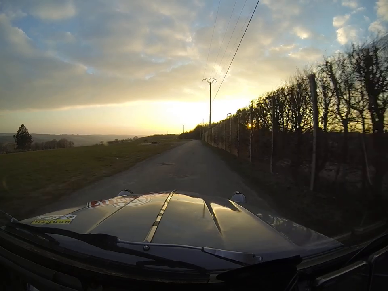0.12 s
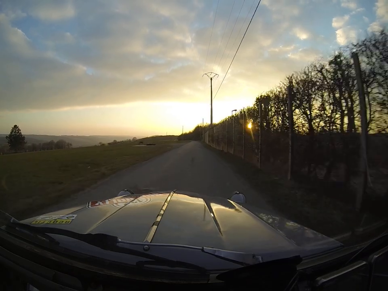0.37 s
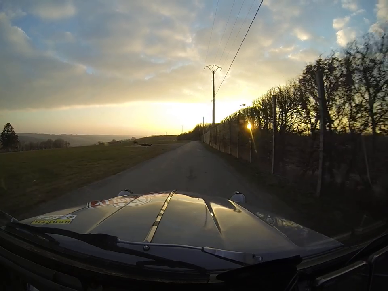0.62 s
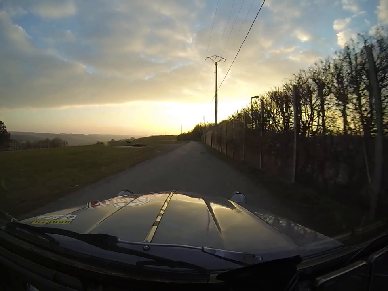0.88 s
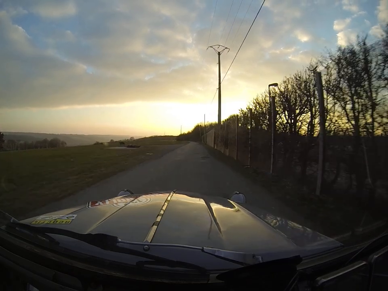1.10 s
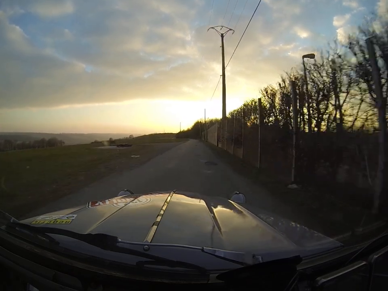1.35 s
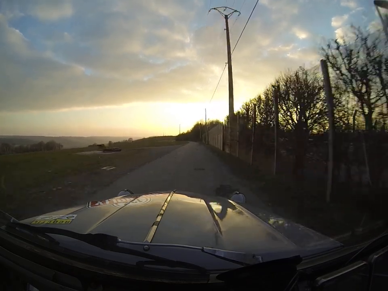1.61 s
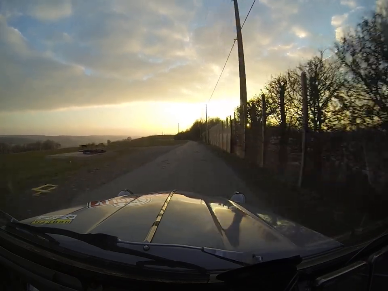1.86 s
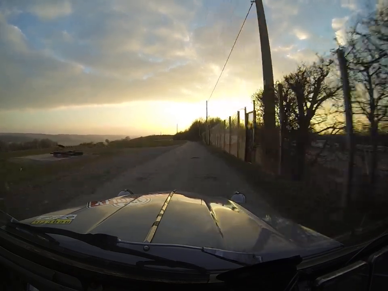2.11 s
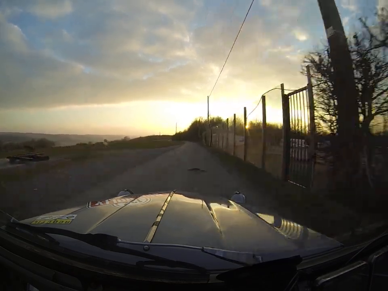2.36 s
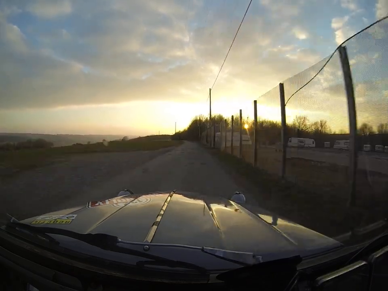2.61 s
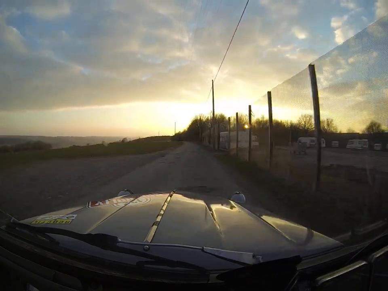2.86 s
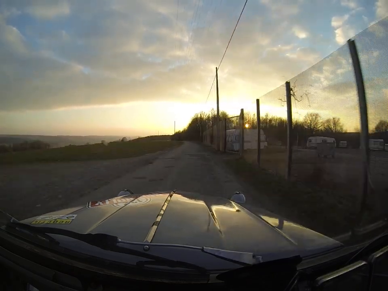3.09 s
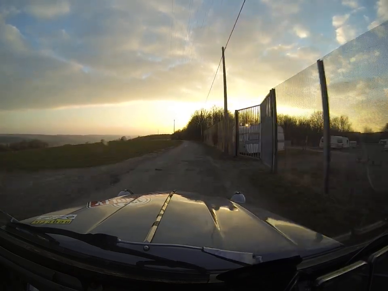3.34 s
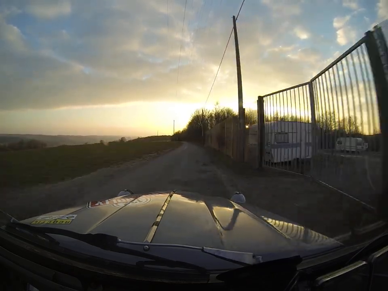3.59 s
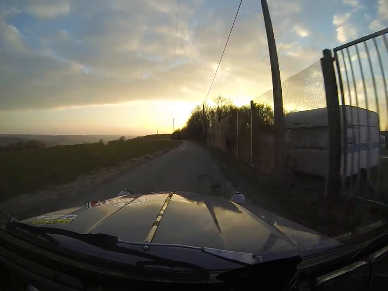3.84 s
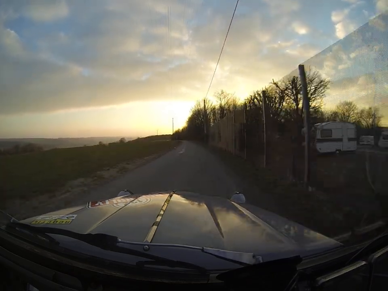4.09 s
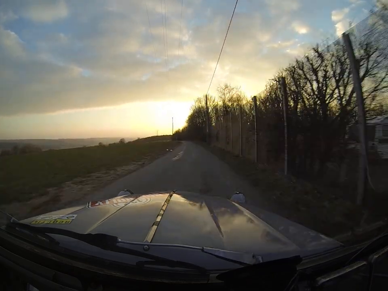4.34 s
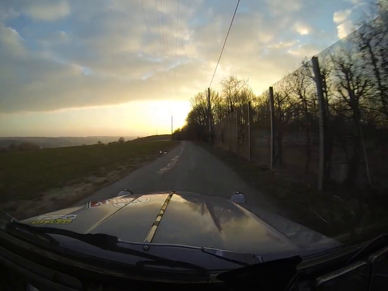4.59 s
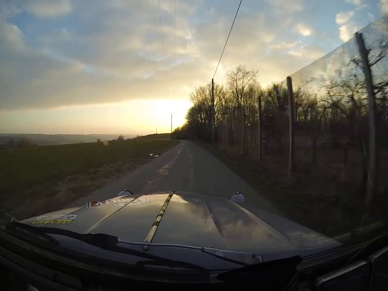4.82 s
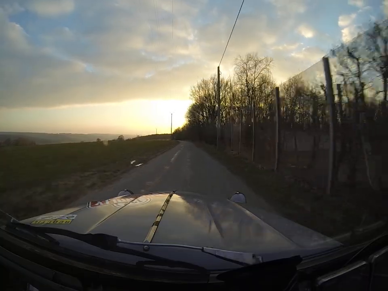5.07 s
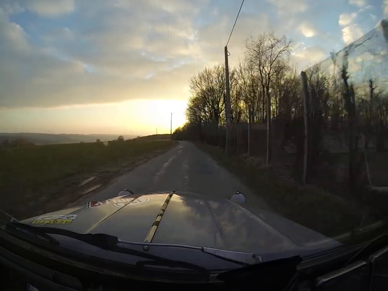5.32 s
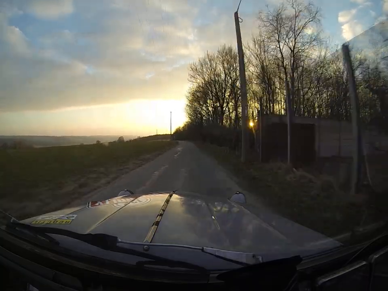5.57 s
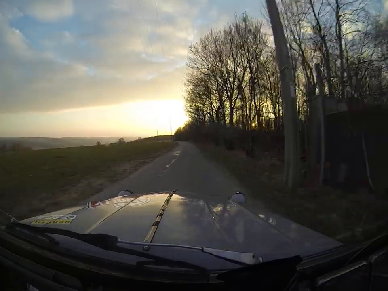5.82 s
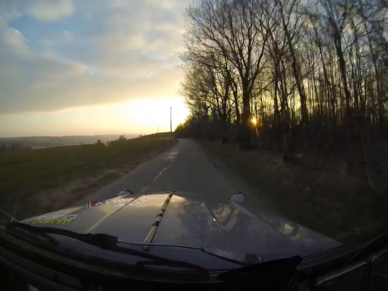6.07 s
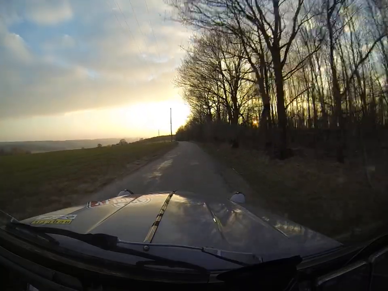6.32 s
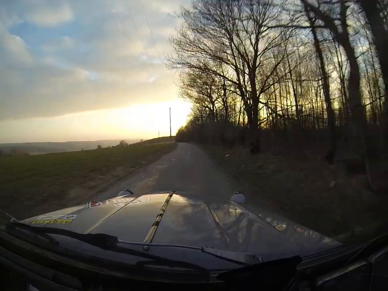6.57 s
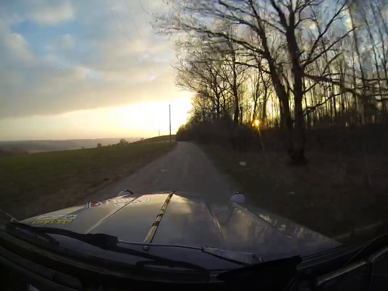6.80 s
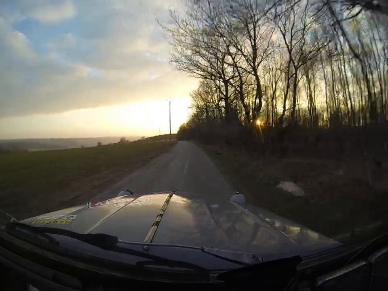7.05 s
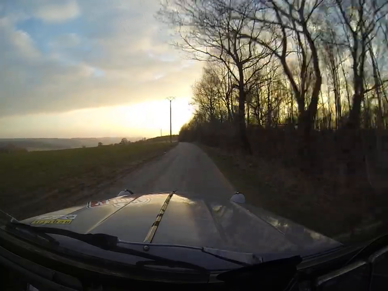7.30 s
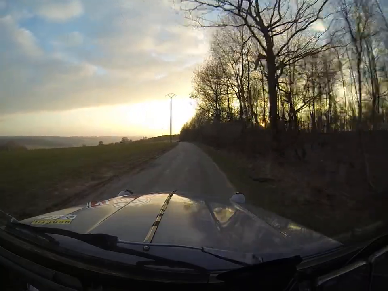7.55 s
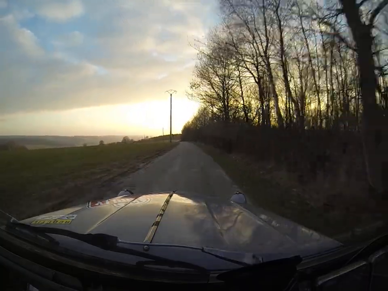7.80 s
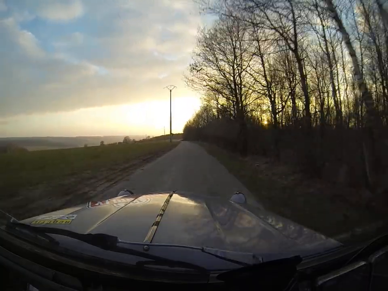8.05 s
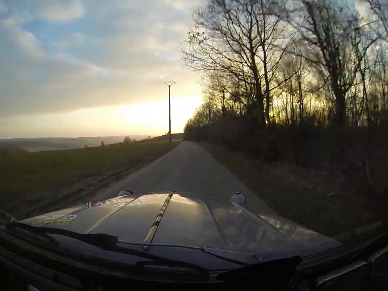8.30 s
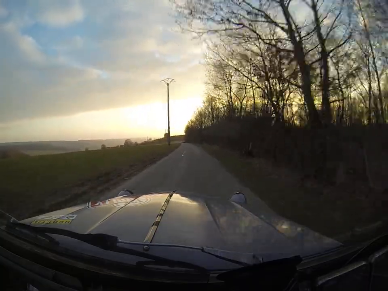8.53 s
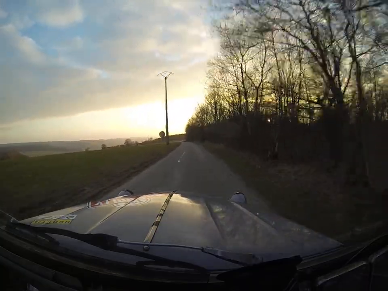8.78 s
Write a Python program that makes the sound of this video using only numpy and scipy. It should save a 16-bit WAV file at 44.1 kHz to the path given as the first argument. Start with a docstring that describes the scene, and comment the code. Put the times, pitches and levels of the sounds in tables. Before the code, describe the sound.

Cabin of a small old car: buzzy twin-cylinder engine roar, deep road rumble, thumping bumps and rattling trim as the engine gradually slows.

```python
"""Inside the cabin of a small car: an air-cooled twin pulls, then eases off and slows along a rough road.
Low firing orders boom as sines; the exhaust note replays a drifting cycle waveform, coloured by the panels.
Valve gear and fan roar as noise that throbs with the firings; the road is deep lumpy noise and a floor drone.
Jolts are low swings; a short dry click is heard at each, and the level dips after many of them.
Loose trim chatters in noise bursts, and a faint thin whine wavers high up."""
import sys
import numpy as np
from scipy import signal
from scipy.fft import rfft, irfft, next_fast_len
from scipy.io import wavfile
from scipy.ndimage import uniform_filter1d, minimum_filter1d, map_coordinates

SR = 44100
rng = np.random.default_rng(int(sys.argv[2]) if len(sys.argv) > 2 else 0)


def volts_from_decibels(level):
    """Turn decibel levels (scalar or array-like) into linear amplitude factors."""
    exponent = np.asarray(level, float) / 20
    return 10 ** exponent


def log_audio(samples):
    """Write samples as a 16-bit WAV file to the path given in sys.argv[1]."""
    # one column per channel
    frames = np.atleast_2d(samples).T
    # limit to full scale, then quantise
    limited = np.clip(frames, -1, 1)
    pcm = np.round(limited * 32767).astype(np.int16)
    wavfile.write(sys.argv[1], SR, pcm)


N = 392931


def unit(x):
    """Brings x to rms 1."""
    return x / np.sqrt(np.mean(x ** 2) + 1e-20)


def curves(rows):
    """Draws straight lines between timed points: one value per sample for each column after the time."""
    s, *columns = np.transpose(rows)
    return [np.interp(np.arange(N) / SR, s, column) for column in columns]


def wobble(rate):
    """A smooth random curve with rate knots a second."""
    knots = rng.standard_normal(int(N * rate / SR) + 4)
    return map_coordinates(knots, [np.arange(N) * rate / SR])


def coloured(x, spectrum, resonances=()):
    """Filters x through a spectrum on a log frequency axis plus resonant bumps, at rms 1."""
    size = next_fast_len(N + 8192)
    hz = np.fft.rfftfreq(size, 1 / SR)
    points_hz, points_db = np.transpose(spectrum)
    db = np.interp(np.log(hz + 1), np.log(points_hz + 1), points_db, left=-120, right=-120)
    for centre_hz, width_hz, peak_db in resonances:
        db = db + peak_db / (1 + (2 * (hz - centre_hz) / width_hz) ** 2)
    return unit(irfft(rfft(x, size) * volts_from_decibels(db), size)[:N])


def by_load(load, pulling, easing):
    """Blends from the easing-off value at load 0 to the pulling value at load 1."""
    return easing + load * (pulling - easing)


# low booming orders: (multiple of firing rate, rms level pulling [dB], rms level easing off [dB],
# gain per Hz of firing rate [dB/Hz]); the third order nears a floor resonance at full speed
BOOM_ORDERS = [(1, -22, -20, -0.45), (2, -29.5, -20.5, -0.08), (3, -29, -34, 1)]
CRUISE_HZ = 65.5  # firing rate at which the gain per Hz adds nothing
BOOM_FOLLOWS = .1  # dB of boom for each dB of effort


def booms(firing_hz, firings, load, roar_db, slack_db):
    """Sines locked to the firings boom in the body, each wavering in level by itself."""
    effort_db = BOOM_FOLLOWS * (roar_db - by_load(load, -32.0, -37.5)) + slack_db
    total = np.zeros(N)
    for order, pulling_db, easing_db, db_per_hz in BOOM_ORDERS:
        waver_db = .9 * wobble(2.2) + .8 * wobble(7.6)
        speed_db = db_per_hz * (firing_hz - CRUISE_HZ)
        level_db = by_load(load, pulling_db, easing_db) + effort_db + speed_db + waver_db
        phase = 2 * np.pi * (round(order) * firings + rng.random())
        total += np.sqrt(2) * volts_from_decibels(level_db) * np.sin(phase)
    return total


# orders that stand out of the engine note:
# (multiple of firing rate, lift while pulling [dB], lift while easing off [dB])
NOTE_ORDERS = [(5, -2, -3), (5.5, 2, 1), (6, 1, 0), (6.5, -4, -2), (7, -5, -2), (7.5, 5, 0), (8, 5, 0),
               (9, 8, 3), (10, -5, -3), (10.5, 2, 0), (11, -1, 0), (11.5, 4, 0), (12, 2, 2), (12.5, 5, 2),
               (13, -1, 0), (13.5, 1, 2), (14, 4, 4), (15, -1, -2), (15.5, -3, -3), (16, 1, -2),
               (17, 0, -5), (18, 11, 3), (19, -2, 3), (20, -4, -1), (25, 1, 3), (27, -3, -3), (27.5, 5, 0),
               (28, 5, 3), (29, 0, 6), (30, 3, 2), (44, 5, -2), (45, 0, 4), (46, 5, 2)]


def cycle_shape(turns, lift_db):
    """Replays one random waveform of a full two-firing cycle as the crank turns."""
    size = 4096
    level_db = np.full(size // 2 + 1, -120.)
    level_db[7:130] = 0  # in halves of the firing rate
    # unequal cylinders put weaker lines halfway between the firing orders
    level_db[1::2] -= 5
    lines = (2 * np.array(NOTE_ORDERS)[:, 0]).round().astype(int)
    level_db[lines] += lift_db
    shape = irfft(volts_from_decibels(level_db) * np.exp(2j * np.pi * rng.random(len(level_db))))
    return unit(np.interp(turns % 1, np.arange(size + 1) / size, np.r_[shape, shape[0]]))


# colour of the exhaust note: (frequency [Hz], relative level [dB])
EXHAUST_COLOUR = [(205, -42.5), (260, -1.5), (330, 5.5), (600, -4.5), (750, -9), (850, 0.5), (1200, -18.5),
                  (1500, -24), (1850, -21.5), (2600, -29), (3000, -24), (4200, -41)]
# panel resonances, for note and roar: (frequency [Hz], width [Hz], gain over the surroundings [dB])
PANEL_MODES = [(320, 18, 2), (445.5, 19, -4), (496, 8.6, -3.5), (795, 14, -4), (1005, 25, -3.5),
               (477, 30, 1.5), (829, 14, 3), (853, 40, 2.5), (1023, 50, 5.5), (1383, 26, 3.5),
               (1620, 44, 4), (1705, 40, 5), (1811, 34, 6), (1827, 450, 4), (1903, 33, 4.5),
               (2120, 45, 7.5), (2280, 35, 7), (2887, 100, 6.5), (2950, 25, 3), (3010, 32, 9),
               (3180, 50, 4.5)]
NOTE_DB = (-2.5, -5)  # note against the roar, pulling and easing off


def exhaust_note(firings, load, slack_db):
    """Repeating cycle waveforms pass through the panels, with a colour for pulling and one for easing off."""
    _, pulling_db, easing_db = np.transpose(NOTE_ORDERS)
    # the cycle's shape drifts, so each order waxes and wanes
    drift = 1.8 * wobble(4)
    note = np.zeros(N)
    for share, lift_db in [(load ** 2, pulling_db), (1 - load ** 2, easing_db)]:
        for part in (1, .5 * np.cos(drift), .5 * np.sin(drift)):
            note += part * np.sqrt(share) * cycle_shape(firings / 2, lift_db)
    level_db = by_load(load, *NOTE_DB) + slack_db / 2  # slack drops the note half as far as the boom
    return volts_from_decibels(level_db) * coloured(note, EXHAUST_COLOUR, PANEL_MODES)


# colour of the noise through the bulkhead: (frequency [Hz], relative density [dB])
BULKHEAD_COLOUR = [(120, -29.5), (205, -3), (267, -8.5), (384, -4), (447, -7.5), (739, -12), (849, -7),
                   (1270, -23.5), (1490, -29), (1850, -29.5), (2150, -26.5), (2630, -31.5), (2950, -29.5),
                   (3300, -31), (3700, -33), (4200, -43), (5000, -70)]
PANEL_SHIFT = .003  # share by which the panels' pitch goes down and up


def bulkhead_roar(throb):
    """Valve gear and fan: throbbing noise, faded between lower and higher panel pitch as the body flexes."""
    flex = np.pi / 4 * (1 + np.tanh(2 * wobble(5)))
    roar = np.zeros(N)
    for share, shift in [(np.cos(flex), -PANEL_SHIFT), (np.sin(flex), PANEL_SHIFT)]:
        panels = [(hz * (1 + shift), *rest) for hz, *rest in PANEL_MODES]
        roar += share * coloured(throb * rng.standard_normal(N), BULKHEAD_COLOUR, panels)
    return roar


# colour of the airy hiss: (frequency [Hz], relative density [dB])
AIR_COLOUR = [(3000, -34.5), (4200, 1), (5500, -3), (6500, -11.5), (7600, -15.5), (8800, -12.5),
              (10000, -19.5), (12000, -22.5), (14000, -35), (15700, -46.5)]


def air_hiss(throb):
    """High noise that throbs half as deep in dB as the roar and flickers fast."""
    flicker = volts_from_decibels(0.66 * wobble(60))
    return volts_from_decibels(-33.5) * coloured(np.sqrt(throb) * flicker * rng.standard_normal(N), AIR_COLOUR)


# engine speed: (time [s], firing rate [Hz])
FIRING_RATE = [(0, 63.9), (.9, 65.1), (2.1, 65.7), (2.9, 65.95), (3.6, 65.8), (4.5, 65.3), (5.15, 65.25),
               (6, 63.85), (6.5, 63.3), (7.8, 60.7), (8.9, 59.1)]
# engine effort: (time [s], noise level before a 2 dB lift [dB])
EFFORT = [(0, -30.5), (.47, -28.5), (.7, -28.5), (1.06, -32), (1.5, -30.5), (1.98, -30), (2.7, -31),
          (3.3, -30), (3.7, -31), (4.2, -29.5), (4.6, -31.5), (5.1, -31.5), (5.5, -31), (5.82, -30.5),
          (6.2, -31.5), (7.05, -33.5), (8.05, -32), (8.9, -33.5)]
# load on the engine: (time [s], load [1 pulling, 0 easing off])
ENGINE_LOAD = [(0, 0.6), (.5, 0.4), (.62, 0.98), (3.5, 0.95), (4.3, 0.08), (8.05, 0.1), (8.3, 0.38),
               (8.9, 0.63)]
# the drive goes slack between pulling and easing off
SLACK_AT_S, SLACK_HALF_S, SLACK_DB = 3.92, 0.22, -16


def engine(dip):
    """Booming low orders, a note that repeats every cycle, and a roar and hiss that throb with the firings."""
    firing_hz, = curves(FIRING_RATE)
    roar_db, = curves(EFFORT)
    load = np.clip(curves(ENGINE_LOAD)[0], 0, 1)
    firings = np.cumsum(firing_hz * (1 + 0.0008 * wobble(6))) / SR
    slack_db = SLACK_DB * np.exp(-((np.arange(N) / SR - SLACK_AT_S) / SLACK_HALF_S) ** 2)
    # noise swells with each firing and each cylinder's turn
    firing_db = 0.67 * np.cos(2 * np.pi * firings)
    cylinder_db = 0.95 * np.cos(np.pi * firings + 1.1)
    throb = volts_from_decibels(firing_db + cylinder_db + 1.1 * wobble(11))
    boom = booms(firing_hz, firings, load, roar_db, slack_db)
    body = bulkhead_roar(throb) + exhaust_note(firings, load, slack_db)
    noisy = dip * body + dip ** HISS_DIP_SHARE * air_hiss(throb)
    return dip ** LOW_DIP_SHARE * boom + volts_from_decibels(roar_db + 2.0) * noisy


# road roughness: (time [s], rumble level [dB])
ROUGHNESS = [(0, -15), (.6, -14), (1.3, -15), (1.9, -12), (2.25, -14), (2.6, -10.5), (3.2, -16),
             (3.55, -14.5), (4, -10), (4.5, -15), (5.2, -16.5), (5.8, -12.5), (6.3, -15.5), (6.7, -14),
             (7.5, -16), (8.2, -16), (8.9, -10.5)]
# colour of the rumble: (frequency [Hz], relative density [dB])
RUMBLE_COLOUR = [(3.5, -36.5), (6.0, -12), (27, 5.5), (56, -9.5), (73, -42.5), (120, -120)]
# colour of the floor drone: (frequency [Hz], relative density [dB])
DRONE_COLOUR = [(29, -33.5), (50, -3.5), (67, -1.5), (82, -2), (96, -3.5), (110, -3.5), (140, -7),
                (165, -5), (188, -12), (231, -31), (260, -31), (340, -63.5), (570, -120)]
DRONE_DB, DRONE_FOLLOWS = -19, 0.57  # mean floor drone level; its share of the roughness swings
LUMPS_DB, LUMPS_PER_S = 1.17, 13  # random unevenness of the surface


def lumps():
    """Random unevenness of the surface, as a gain at rms 1."""
    return unit(volts_from_decibels(LUMPS_DB * wobble(LUMPS_PER_S)))


def road():
    """Wheels shake the body: a deep lumpy rumble and a drone of the floor."""
    rough_db, = curves(ROUGHNESS)
    rumble = coloured(rng.standard_normal(N), RUMBLE_COLOUR)
    # the body's motion is steadier than pure noise: part of its swelling is evened out
    swelling = np.abs(signal.hilbert(rumble))
    rumble = unit(rumble / (swelling + 0.45) ** 0.25)
    drone = coloured(rng.standard_normal(N), DRONE_COLOUR)
    drone_db = DRONE_DB + DRONE_FOLLOWS * (rough_db - rough_db.mean())
    return volts_from_decibels(rough_db) * lumps() * rumble + volts_from_decibels(drone_db) * lumps() * drone


# jolts of the body, for push, click and dip: (time [s], signed push [full scale],
# click level before a 3 dB cut [dB], dip after it [dB, below 0 gives none])
BODY_JOLTS = [(0.459, 0.17, -62, -2.5), (0.512, 0.22, -51, -0.5), (0.544, 0.43, -43, 2.5),
              (0.555, 0.61, -42, 5), (.703, 1, -43, 1.5), (0.9554, -0.75, -42.5, 3.5),
              (1.622, -0.27, -56, -2.5), (1.896, 0.21, -50, -6), (2.0418, -0.66, -40, 9.5),
              (2.557, -0.61, -41, 5), (2.582, 0.62, -45, 1), (2.929, -0.52, -50.5, 1),
              (3.1678, -0.83, -38.5, 5.5), (3.298, 0.47, -47, 3), (3.5238, 0.5, -40, 9),
              (3.7388, 0.81, -43.5, 8), (3.938, 0.049, -37.5, 1.5), (3.975, -0.39, -47.5, 10),
              (4.165, -0.6, -52.5, 5), (4.286, 0.63, -47, 4), (4.832, -0.48, -55, 2),
              (5.352, -0.85, -48.5, 2.5), (5.62, -0.37, -57, -1.5), (5.831, 0.25, -49, 0),
              (5.866, -0.26, -45, 1.5), (5.885, 0.48, -42.5, 5), (5.898, -0.29, -45, 2),
              (5.943, 0.31, -55.5, 0.5), (5.976, -0.66, -46, 2.5), (6.269, 0.24, -46, 1),
              (6.381, 0.4, -53.5, 4.5), (6.5413, -0.53, -55.5, 3), (6.874, 0.52, -48.5, 1),
              (6.9676, 0.57, -53.5, 3.5), (7.161, 0.57, -42, 2), (7.354, 0.14, -48, 1),
              (7.42, -0.19, -47.5, -3), (7.499, 0.67, -55, 3), (7.712, 0.67, -43.5, 2.5),
              (8.032, -0.53, -55, -2), (8.124, 0.37, -50, 0), (8.209, -0.7, -47.5, 2.5),
              (8.2525, -0.36, -41.5, 1), (8.292, 0.71, -46, -4), (8.299, 0.0043, -50, -1.5),
              (8.327, 0.23, -45, 4.5), (8.3492, -0.78, -41, 1), (8.403, -0.2, -48, 0),
              (8.673, -0.33, -41.5, 3)]
JOLT_HZ = 40.2  # how fast the body swings out and back


def jolts():
    """Each jolt is one low push with a swing back on either side."""
    half = SR // 10
    swing = (np.pi * JOLT_HZ * np.arange(-half, half) / SR) ** 2
    pulse = (1 - 2 * swing) * np.exp(-swing)
    body = np.zeros(N)
    for s, push, *_ in BODY_JOLTS:
        body[round(s * SR) - half:][:len(pulse)] += push * pulse
    return body


# colour of the clicks: (frequency [Hz], relative density [dB])
CLICK_COLOUR = [(1000, -20.5), (2500, 3), (4500, 2), (7000, -5), (10000, -13), (12500, -18), (15700, -27)]
CLICK_S, CLICK_LAG_S = .0011, .001  # half length before a random stretch; delay after the listed time


def clicks():
    """A short dry click as the level drops, a few milliseconds of noise with no tail."""
    t = np.arange(-200, 200) / SR
    shape = np.zeros(N)
    for s, _, db, _ in BODY_JOLTS:
        half_s = CLICK_S * rng.uniform(.8, 1.8)
        start = round((s + CLICK_LAG_S) * SR) - len(t) // 2
        shape[start:][:len(t)] += volts_from_decibels(db - 3) * np.exp(-(t / half_s) ** 2)
    return shape * coloured(rng.standard_normal(N), CLICK_COLOUR)


FALL_S, QUICK_S, SLOW_S, SLOW_SHARE = 0.0033, 0.04, 0.27, 0.4  # a dip: fall, quick and slow recovery
LOW_DIP_SHARE, HISS_DIP_SHARE = .4, 0.78  # rumble, drone, booms and hiss dip less than the roar


def dips():
    """After many of the jolts the level falls by the listed depth, recovers quickly, then creeps up."""
    t = np.arange(2 * SR) / SR
    recovery = (1 - SLOW_SHARE) * np.exp(-t / QUICK_S) + SLOW_SHARE * np.exp(-t / SLOW_S)
    shape = np.minimum(t / FALL_S, 1) * recovery
    drop_db = np.zeros(N + len(t))
    for s, *_, db in BODY_JOLTS:
        drop_db[round(s * SR):][:len(t)] += max(db, 0) * shape
    return volts_from_decibels(-drop_db[:N])


# trim rattles: (time [s], relative level [dB], dull part over bright before the kind's own lift [dB])
TRIM_RATTLES = [(0.6054, -55, 7), (0.6823, -47, -4), (0.7194, -54, -6), (0.7344, -60, -4),
                (0.7993, -46.5, -10), (1.0745, -53, 0), (1.2204, -59.5, 3), (2.1235, -56, -1),
                (2.141, -58, 2), (2.1665, -61, -7), (2.48, -50.5, 7), (2.4932, -52, -2), (2.6484, -56, 0),
                (2.6614, -48, -4), (3.48, -59, -3), (3.4925, -56.5, 2), (3.7934, -56, 4), (3.823, -50, -4),
                (3.9095, -59, -5), (3.9244, -51, 8), (4.0382, -56, 1), (4.0562, -50.5, -6),
                (4.0961, -47.5, -3), (4.155, -47.5, 0), (4.2313, -55, -2), (4.2637, -48.5, -4),
                (4.4927, -55.5, -7), (4.5476, -48, -8), (4.6074, -49.5, -7), (4.7107, -49.5, -7),
                (4.9733, -58, -6), (5.8571, -50, -3), (6.1005, -59, -4), (6.1449, -59, 0),
                (6.2133, -47, -8), (6.2866, -53.5, -9), (6.339, -48, -6), (6.3739, -50.5, -4),
                (6.504, -55, -2), (6.56, -54, -8), (6.6109, -43, -1), (6.6732, -51, -5),
                (6.7206, -47.5, -3), (6.7584, -56, -5), (6.8525, -46, -6), (6.9127, -48, -4),
                (6.956, -52, -3), (7.0288, -45, -7), (7.486, -54, -7), (7.5423, -57.5, 1),
                (8.0366, -52, -1), (8.1534, -53, -5), (8.5195, -62, 0), (8.5434, -60, -5),
                (8.5754, -61, -4), (8.5914, -63, -9), (8.655, -51, -4), (8.7131, -57, -5), (8.741, -62, -9)]
# colour of the trim: (frequency [Hz], relative density [dB])
TRIM_COLOUR = [(700, -21), (1300, -2), (2600, -3), (4200, 16), (6000, 2.5), (7500, -10), (8800, -11.5),
               (11000, -20), (13000, -25), (15700, -33.5)]
# what the trim rings with: (frequency [Hz], width [Hz], gain over the surroundings [dB])
TRIM_MODES = [(6500, 200, 3.5), (8730, 130, 9.5), (9100, 120, 4), (10900, 280, 3), (11100, 120, 3.5)]
RATTLE, FAINT = (0.053, 4), (0.043, 3.4)  # rattles and faint ticks: burst t60 [s], lift of the dull part [dB]


def trim():
    """Loose trim chatters: noise rattles, each with its own colour; many faint short noise ticks at random times."""
    t = np.arange(SR // 8) / SR
    high, low = np.zeros((2, N + len(t)))
    tick_s = rng.random(400) * N / SR
    ticks = np.c_[tick_s, -71 + 4 * rng.standard_normal(400), 1.4 * rng.standard_normal(400)]
    for rows, (t60, low_db) in [(ticks, FAINT), (TRIM_RATTLES, RATTLE)]:
        # a quick burst, then the cabin's short answer
        decay = volts_from_decibels(-60 * t / t60) + volts_from_decibels(-20 - 60 * t / 0.29)
        burst = decay * (1 - np.exp(-t / 0.0015))
        for s, db, dull_db in rows:
            start = round(s * SR)
            high[start:][:len(t)] += volts_from_decibels(db) * burst
            low[start:][:len(t)] += volts_from_decibels(db + dull_db + low_db) * burst
    chatter = volts_from_decibels(2.5 * wobble(900))
    noise = coloured(rng.standard_normal(N), TRIM_COLOUR, TRIM_MODES)
    bright = signal.sosfiltfilt(signal.butter(4, 7000, "high", fs=SR, output="sos"), noise)
    dull = noise - bright
    return volts_from_decibels(-5) * chatter * (high[:N] * unit(bright) + low[:N] * unit(dull))


WHINE_HZ, WHINE_DB = 12890, -86.5  # centre of its wavering pitch and level


def whine():
    """A faint thin high sine that wavers in pitch and flickers in level."""
    phase = 2 * np.pi * np.cumsum(WHINE_HZ + 20 * wobble(60)) / SR
    return volts_from_decibels(WHINE_DB + 2.5 * wobble(15)) * np.sin(phase)


def scene():
    """All sources add up in one channel; engine and road dip after many of the jolts, by the listed depth."""
    dip = dips()
    driving = engine(dip) + dip ** LOW_DIP_SHARE * road()
    return (driving + jolts() + clicks() + trim() + whine())[None]


def top_cut(x):
    """Nothing passes above the cut-off."""
    return signal.sosfilt(signal.butter(12, 15719, fs=SR, output="sos"), x)


def record(dry):
    """A fast limiter holds the peaks and the start fades in over 4 ms."""
    need = np.minimum(1, .76 / (np.abs(dry) + 1e-9)) ** .93
    # hold the lowest gain around each peak, then smooth it twice
    gain = uniform_filter1d(minimum_filter1d(need, size=441, axis=1), size=441, axis=1)
    gain = uniform_filter1d(gain, size=200, axis=1)
    fade_in = np.minimum(1, np.arange(N) / (.004 * SR))
    return top_cut(dry * gain * fade_in)


dry = scene()
out = record(dry)
log_audio(out)
```